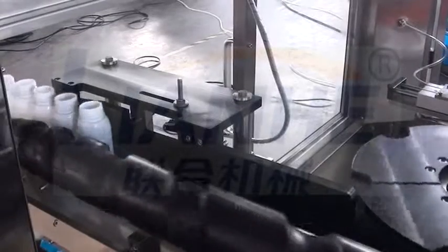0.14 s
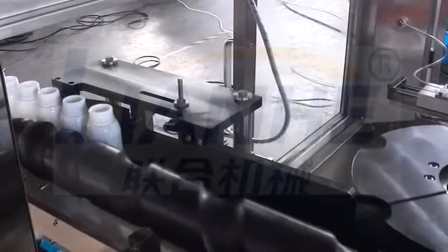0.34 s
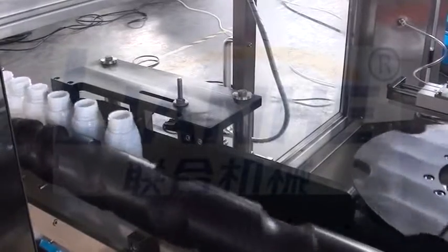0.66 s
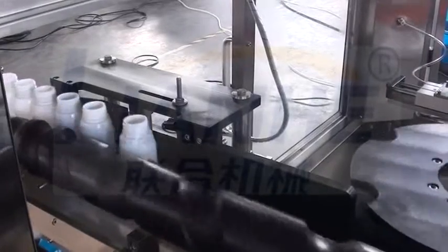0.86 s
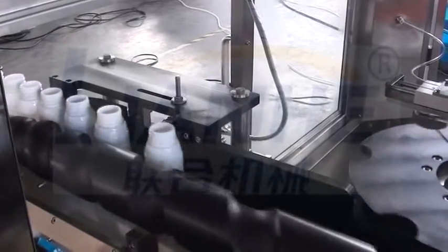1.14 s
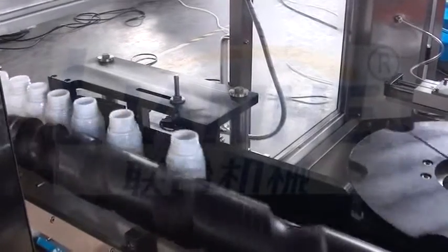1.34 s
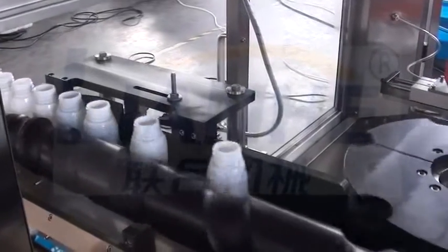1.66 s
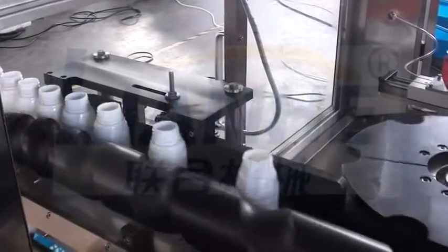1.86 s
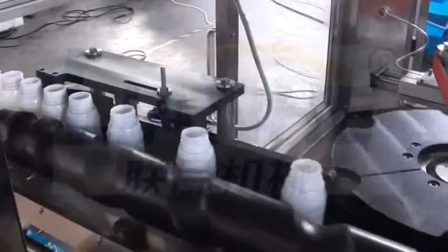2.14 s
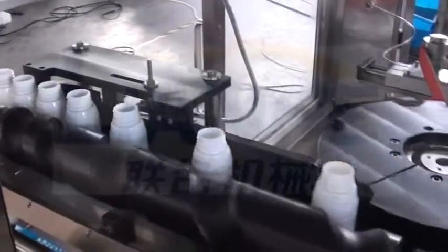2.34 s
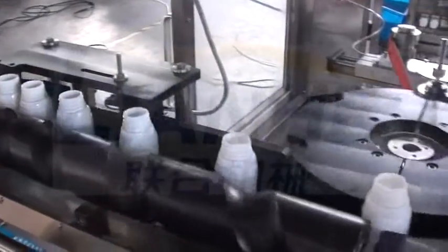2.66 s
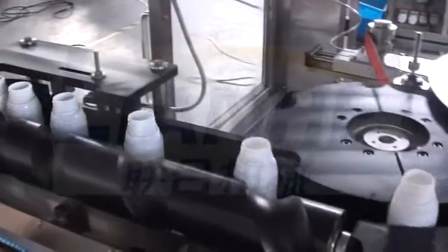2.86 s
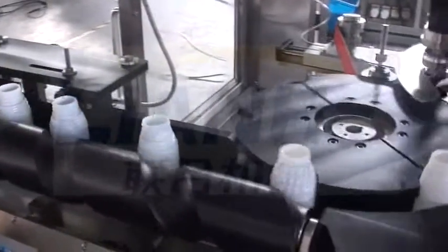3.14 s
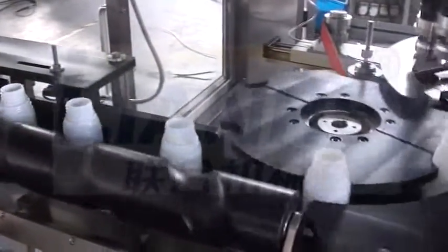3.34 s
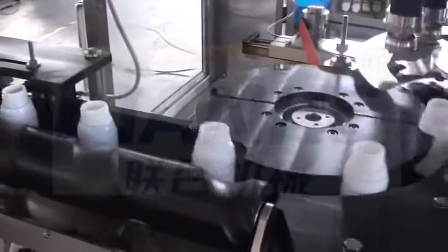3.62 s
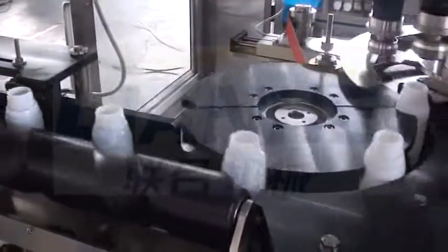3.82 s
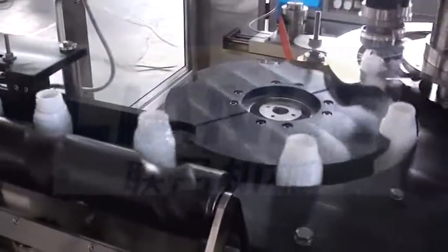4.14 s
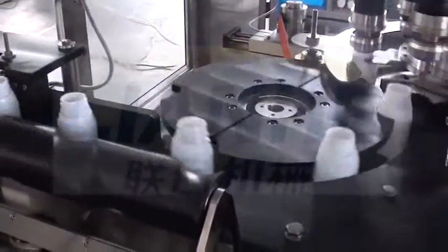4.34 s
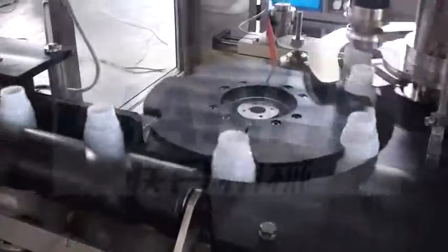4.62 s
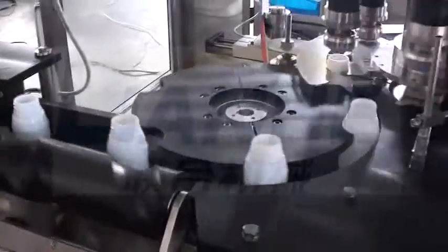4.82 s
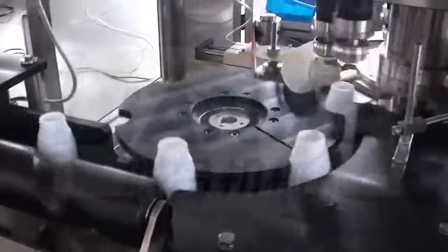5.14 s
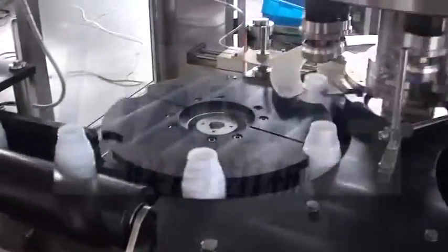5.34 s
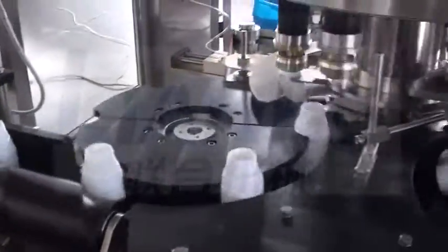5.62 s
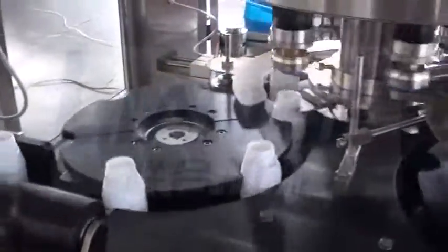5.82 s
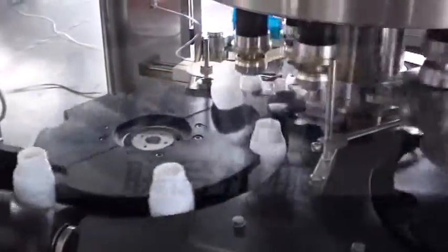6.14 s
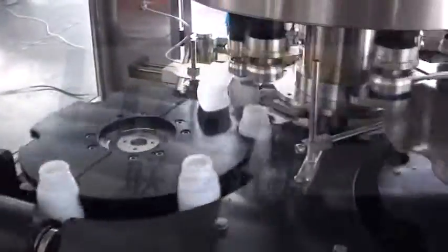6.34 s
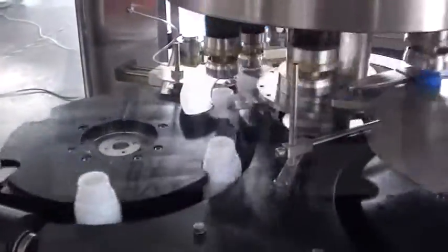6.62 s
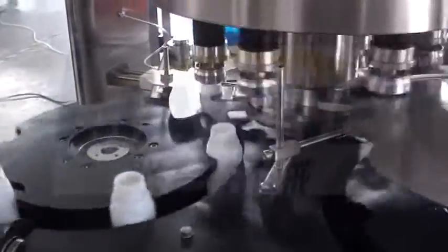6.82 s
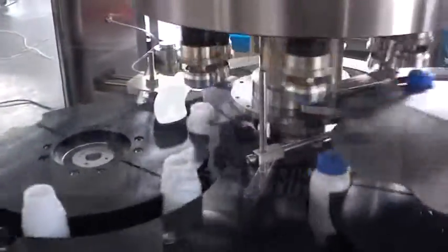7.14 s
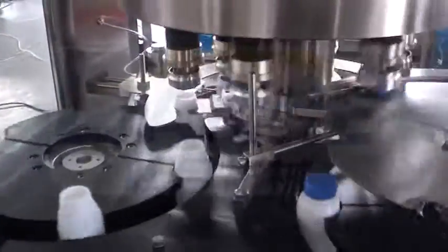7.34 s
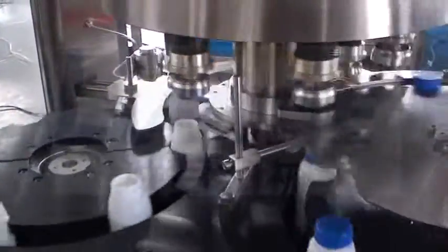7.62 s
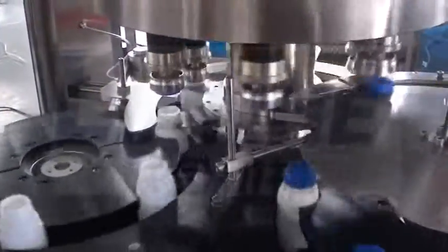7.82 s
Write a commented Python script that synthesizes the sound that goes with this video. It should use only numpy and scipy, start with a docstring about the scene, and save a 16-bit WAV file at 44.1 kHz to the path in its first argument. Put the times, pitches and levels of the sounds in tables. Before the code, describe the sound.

A rotary capping machine runs close to the microphone in a factory hall with a short, metallic echo. Its drives rumble and hum throughout, growing slightly louder over the eight seconds. From the very start, about every 0.6 seconds, an air cylinder clacks, thuds and vents a short, bright hiss, briefly pushing down the other noise. Loose parts clatter faintly underneath.

Plastic bottles click and snap between about 1 and 3 seconds, and again around 5 to 5.5. Sharp steel ticks and lightly ringing knocks are scattered throughout, with brief hollow scrapes around 4.1, 4.6 and 6.7 seconds. Softer air puffs fall between strokes near 3.2, 4 and 6.5 seconds. At about 6.9 a harder knock rings on a steel guide. A wavering air leak then grows louder, and from 7.3 to 7.8 seconds the chucks give several very short, high squeals on the caps.

```python
"""A factory hall, where a rotary capping machine runs close to a camera moving towards its heads.
Over the rumble of the drives, steel parts scrape, tick and ring, plastic bottles click in the feed
screw, and late on the chucks squeal on the caps by stick-slip friction. About every 0.63 s an air
cylinder clacks, thuds home and vents a turbulent jet. Steel plates and the hall reflect these
sounds, and the camera's limiter ducks the din under each blast."""
import sys
import numpy as np
from scipy import signal
from scipy.fft import rfft, irfft, next_fast_len
from scipy.io import wavfile
from scipy.ndimage import uniform_filter1d, minimum_filter1d, map_coordinates

SR = 44100
rng = np.random.default_rng(int(sys.argv[2]) if len(sys.argv) > 2 else 0)


def master_out(mix):
    """Clip the mix to full scale and print it as 16-bit PCM to the path in sys.argv[1]."""
    frames = np.transpose(np.atleast_2d(mix))
    ceiling = np.clip(frames, -1, 1)
    pcm = np.round(ceiling * 32767).astype(np.int16)
    wavfile.write(sys.argv[1], SR, pcm)


N = 351477


def amp(db):
    """Decibels to amplitude ratio."""
    return 10 ** (np.asarray(db) / 20)


def unit(x):
    """Normalisation to rms 1."""
    return x / np.sqrt(np.mean(x ** 2) + 1e-20)


def along(points, hz):
    """Interpolation of (frequency [Hz], value) points on a log axis."""
    f, v = np.transpose(points)
    return np.interp(np.log(hz + 1), np.log(f + 1), v)


def wobble(rate, size=N):
    """Smooth random modulation with `rate` knots a second."""
    knots = rng.standard_normal(int(size * rate / SR) + 4)
    return map_coordinates(knots, [np.arange(size) * rate / SR])


def filtered(x, response):
    """Linear filtering: the spectrum of x times a frequency response."""
    m = next_fast_len(len(x) + SR // 4)
    return irfft(rfft(x, m) * response(np.fft.rfftfreq(m, 1 / SR)), m)[:len(x)]


def resonate(x, modes):
    """Modal superposition: x drives (frequency [Hz], bandwidth [Hz], level [dB]) resonators."""
    return filtered(x, lambda f: sum((-1) ** k * amp(db) * 1j * f * bw / (hz * hz - f * f + 1j * f * bw)
                                     for k, (hz, bw, db) in enumerate(modes)))


def noise(spectrum, size=N):
    """Coloured noise of rms 1, cut off at the last point of its spectrum."""
    white = rng.standard_normal(size)
    return unit(filtered(white, lambda hz: amp(along(spectrum, hz)) * (hz < spectrum[-1][0])))


def ringing(hz, width_hz, size):
    """Noise of rms 1 in one steep-sided resonance."""
    mode = [(hz, width_hz, 0)]
    return unit(resonate(resonate(rng.standard_normal(size), mode), mode))


def burst(t, rise, hold, t60):
    """Quadratic attack, with exponential decay from time `hold`; all in seconds."""
    return np.clip(t / rise, 0, 1) ** 2 * amp(-60 * np.maximum(t - hold, 0) / t60)


def add(track, s, sound):
    """Superposition of a sound on the track at time s."""
    start = round(s * SR)
    part = sound[max(-start, 0):max(N - start, 0)]
    track[max(start, 0):][:len(part)] += part


# decay of the hall: (frequency [Hz], reverberation time [s])
HALL_DECAY = [(150, 0.41), (1500, 0.4), (7000, 0.54)]

def hall(x):
    """Reverberation: in the steel cabinet and the hall each frequency decays at its own rate."""
    hz, t, spectra = signal.stft(rng.standard_normal(SR // 2), SR, nperseg=256)
    decay = amp(-60 * t / along(HALL_DECAY, hz)[:, None])
    tail = signal.istft(spectra * decay, SR, nperseg=256)[1]
    return signal.fftconvolve(x, tail / np.linalg.norm(tail))[:N]


# reflections off nearby steel plates: (delay [s], level [dB])
PLATE_ECHOES = [(.0019, -19.5), (.0047, -13), (.0083, -17)]

def plates(x):
    """Comb filtering: short echoes interfere with the direct sound and colour it metallic."""
    return filtered(x, lambda hz: 1 + sum(amp(db) * np.exp(-2j * np.pi * hz * delay)
                                          for delay, db in PLATE_ECHOES))


# noise of drives and conveyors: (frequency [Hz], spectrum level [dB])
DRIVE_SPECTRUM = [(25, -43.5), (72, -16), (125, -10.5), (151, -5), (206, -11.5), (490, -12.5), (950, -9.5),
                  (1200, -11.5), (1850, -13.5), (2250, -15.5), (3900, -16.5), (4900, -20.5), (6200, -21.5),
                  (7700, -20)]
# frame resonances: (frequency [Hz], bandwidth [Hz], level [dB])
FRAME_MODES = [(159.5, 16, -6), (275, 37, -3.5), (360, 49, -3.5), (627.4, 50, -1.5), (991, 100, -9.5)]
# motor and gear tones: (frequency [Hz], level [dB])
MOTOR_TONES = [(150.7, -40.5), (639, -44.5), (1566, -55), (2305, -59)]

def drives():
    """Forced vibration: gears and conveyors shake the frame, under slightly unsteady motor tones."""
    t = np.arange(N) / SR
    din = noise(DRIVE_SPECTRUM) * amp(-1 + 0.41 * wobble(7) + 0.72 * wobble(70))
    frame = unit(resonate(rng.standard_normal(N), FRAME_MODES)) * amp(-7.5 + 1.1 * wobble(9))
    hum = sum(amp(db + 0.7 * wobble(6.9)) * np.sin(2 * np.pi * hz * t + 0.68 * wobble(8))
              for hz, db in MOTOR_TONES)
    approach = amp(-26.5 + 0.2354 * (t - t.mean()))  # louder as the camera moves in
    return approach * (din + frame) + hum


# escaping air: (frequency [Hz], spectrum level [dB])
JET_SPECTRUM = [(300, -39.5), (2000, -20), (3000, -10), (3700, -6.5), (4400, -2.5), (5000, -5.5),
                (5900, -1.5), (6600, 1.5), (7500, 1.5), (11000, -0.5), (16000, -12.5)]
# leak at the heads, louder as they come near: (time [s], level [dB])
LEAK_LEVELS = [(0, -38), (1.4, -40.5), (2.3, -49), (3.9, -42), (4.5, -35.5), (5.3, -44), (5.9, -30.5),
               (6.6, -42), (7.05, -26), (7.97, -24)]

def leak():
    """Turbulence: air leaking at the heads gives a continuous, wavering hiss."""
    level_db = np.interp(np.arange(N) / SR, *np.transpose(LEAK_LEVELS))
    return amp(level_db + wobble(18)) * noise(JET_SPECTRUM)


# clack of loose parts and of the cylinder's slide: (frequency [Hz], spectrum level [dB])
CLACK_SPECTRUM = [(60, -24), (290, 1), (450, -4.5), (650, -2.5), (1250, -7), (1900, -1.5), (2250, -7),
                  (3000, -2.5), (3500, -5.5), (4300, -4.5), (5000, -10.5), (6300, -6.5), (7700, -9)]

def loose_parts():
    """Random impacts: loose parts make a faint clatter."""
    envelope, t = np.zeros(N), np.arange(SR // 2) / SR
    for when, strength in rng.random(size=(70, 2)):
        add(envelope, when * N / SR, amp(-40 + 7 * strength) * burst(t, 0.00047, 0.002, 0.05))
    return envelope * noise(CLACK_SPECTRUM)


# parts rubbing on the rails: (time [s], duration [s], level [dB], frequency [Hz])
RAIL_SCRAPES = [(2.717, 0.27, -44, 2900), (4.099, 0.083, -31, 3170), (4.122, 0.17, -34.5, 1980),
                (4.627, 0.045, -28.5, 1930), (6.688, .08, -36, 2830), (6.814, 0.02, -32, 1800),
                (7.467, 0.02, -28.5, 3060)]

def rails():
    """Sliding friction: rubbing excites a broad resonance, giving a rough, hollow scrape."""
    out, t = np.zeros(N), np.arange(SR // 2) / SR
    for s, length, db, hz in RAIL_SCRAPES:
        scrape = amp(db + 4.3 * wobble(110, len(t))) * ringing(hz, 950, len(t))
        add(out, s, scrape * burst(t, 0.011, length, 0.2))
    return out


# modes of the steel guides: (frequency [Hz], level [dB], decay time T60 [s])
GUIDE_MODES = [(1553, -8.5, 0.34), (1870, -6.5, 0.39), (2323, -4.5, 0.45), (2520, 0.5, 0.088),
               (3000, -4.5, 0.14), (3200, -7, 0.25), (4240, -6.5, 0.18)]
# blows on the guides: (time [s], level [dB])
GUIDE_KNOCKS = [(1.272, -23.5), (2.526, -23.5), (3.02, -25), (4.118, -25.5), (4.143, -22), (6.362, -25.5),
                (6.93, -13), (7.567, -25)]

def guides():
    """Free vibration: each blow clicks and leaves the guide's damped modes ringing."""
    out, t = np.zeros(N), np.arange(SR // 2) / SR
    for s, db in GUIDE_KNOCKS:
        ring = np.zeros(len(t))
        for hz, mode_db, t60 in GUIDE_MODES:
            decay = amp(mode_db + rng.normal(0, 1.5) - 60 * t / t60)
            ring += decay * np.sin(2 * np.pi * hz * t + 0.35 * wobble(60, len(t)))
        contact = ringing(3000, 2200, len(t)) * burst(t, 0.001, 0.005, 0.059)
        add(out, s, amp(db) * (amp(-6) * ring + contact))
    return out


# hard contact of steel or bottle: (frequency [Hz], spectrum level [dB])
CONTACT_SPECTRUM = [(300, -17.5), (2000, -22.5), (3500, -6), (4600, -5), (5200, -4), (6400, -4),
                    (7700, -1.5), (12000, -5)]
# small steel parts striking: (time [s], level [dB])
STEEL_TICKS = [(0.105, -18.5), (1.622, -22.5), (4.557, -12.5), (5.284, -16.5), (5.819, -12), (6.364, -20),
               (7.082, -13.5), (7.572, -16)]

def ticks():
    """Impact noise: a brief, hard contact radiates a bright, broadband tick."""
    envelope, t = np.zeros(N), np.arange(SR // 2) / SR
    for s, db in STEEL_TICKS:
        add(envelope, s, amp(db) * burst(t, 0.00065, 0.0029, 0.057))
    return envelope * noise(CONTACT_SPECTRUM)


# bottles snapping against screw and guides: (time [s], level [dB], wall frequency [Hz])
BOTTLE_SNAPS = [(1.028, -25, 3870), (1.081, -17.5, 3970), (1.168, -27, 4400), (1.669, -21, 4160),
                (2.016, -30, 2600), (2.056, -25, 4200), (2.366, -24.5, 3640), (3.020, -24, 3400),
                (4.864, -21.5, 4070), (4.949, -20, 3830), (5.454, -19.5, 4060)]

def bottles():
    """Shell vibration: a struck bottle chatters at the pitch of its wall; a lower mode rings on."""
    out, t = np.zeros(N), np.arange(SR // 5) / SR
    for s, db, hz in BOTTLE_SNAPS:
        wall = ringing(hz, 500, len(t)) * burst(t, 0.00092, 0.0074, 0.062)
        neck = np.sin(2 * np.pi * 0.725 * hz * t) * burst(t, 0.0014, 0.003, 0.13)
        contact = noise(CONTACT_SPECTRUM, len(t)) * burst(t, 0.0009, 0.005, 0.067)
        add(out, s, amp(db) * (wall + amp(-10.5) * neck + amp(-3.5) * contact))
    return out


# chucks slipping on caps:
# (time [s], duration [s], first frequency [Hz], last frequency [Hz], level [dB], scatter [Hz])
CHUCK_SLIPS = [(7.277, 0.012, 6590, 6730, -18.5, 60), (7.355, 0.035, 5440, 5690, -19.5, 100),
               (7.609, .102, 5590, 5440, -23.5, 210), (7.709, .008, 6600, 6650, -16, 60),
               (7.722, 0.037, 6900, 7020, -13, 90)]

def chucks():
    """Stick-slip oscillation: a gliding squeal that scatters in pitch and flutters in strength."""
    out = np.zeros(N)
    for s, length, first_hz, last_hz, db, scatter_hz in CHUCK_SLIPS:
        t = np.arange(int((length + 0.056) * SR)) / SR
        hz = np.interp(t, [0, length], [first_hz, last_hz]) + scatter_hz * wobble(1100, len(t))
        flutter = amp(2.6 * wobble(300, len(t)))
        tone = unit(np.sin(2 * np.pi * np.cumsum(hz) / SR) * flutter)
        add(out, s, amp(db) * tone * burst(t, 0.0035, length, 0.028))
    return out


# softer puffs of air between strokes: (time [s], duration [s], level [dB])
AIR_PUFFS = [(3.196, 0.044, -21), (4.044, 0.17, -23), (6.413, 0.061, -26), (6.663, .1, -22.5)]

def air_jets(exhausts):
    """Jet noise: each exhaust or puff swells as its valve opens and dies as the pressure falls."""
    flow, t = np.zeros(N), np.arange(SR // 2) / SR
    for s, length, db in exhausts + AIR_PUFFS:
        add(flow, s, amp(db) * burst(t, rise=0.035, hold=length, t60=0.11))
    return flow * noise(JET_SPECTRUM) * amp(2 * wobble(90))


# resonances of the machine bed: (frequency [Hz], bandwidth [Hz], level [dB])
BED_MODES = [(116, 39, -2), (257, 55, -1.5), (330, 41, 2), (533, 70, -3.5), (670, 80, -7),
             (1140, 470, -11.5)]
# cylinder strokes, one per bottle:
# (time [s], clack level [dB], clack rise [s], thud level [dB], exhaust duration [s])
CYLINDER_STROKES = [(-.075, -5, 0.0055, -22, 0.064), (.538, -18.5, .0015, -21, 0.076),
                    (1.168, -20.5, 0.0018, -22, 0.066), (1.791, -19.5, 0.0086, -22.5, 0.11),
                    (2.424, -22, 0.0013, -25, 0.083), (3.044, -24, 0.0074, -23.5, 0.092),
                    (3.683, -19.5, .002, -33, 0.063), (4.310, -22.5, 0.0042, -24, 0.068),
                    (4.951, -19.5, 0.0029, -37, 0.071), (5.587, -21, 0.0006, -23.5, 0.098),
                    (6.209, -22, 0.006, -26.5, 0.073), (6.827, -23, .011, -30.5, 0.089),
                    (7.466, -22.5, 0.0065, -45, 0.061)]

def cylinder():
    """Impact excitation: the slide clacks and rattles, then hits its stop and shakes the bed."""
    travel_s, bed_cutoff_hz = 0.026, 85  # the bed radiates little below its cutoff
    out, t = np.zeros(N), np.arange(SR // 3) / SR
    for s, clack_db, rise, thud_db, _ in CYLINDER_STROKES:
        rattle = amp(1.6 * wobble(300, len(t))) * burst(t, rise, rise + 0.0065, 0.28)
        crack = 0.7 * burst(t, rise, 0.002, 0.018)  # only an abrupt blow cracks
        add(out, s, amp(clack_db) * noise(CLACK_SPECTRUM, len(t)) * (crack + rattle))
        force = rng.standard_normal(len(t))
        shake = filtered(force, lambda hz: hz ** 2 / np.hypot(hz ** 2, bed_cutoff_hz ** 2))
        thud = unit(resonate(shake, BED_MODES)) * burst(t, 0.0036, 0.019, 0.11)
        add(out, s + travel_s, amp(thud_db) * thud)
    return out


def scene():
    """Superposition: direct sound, reflections and din meet at one microphone, on both channels."""
    vent_delay_s, vent_db = 0.028, -11  # every stroke vents at the same pressure
    exhausts = [(s + vent_delay_s, length, vent_db) for s, *_, length in CYLINDER_STROKES]
    parts = cylinder() + bottles() + loose_parts() + guides() + ticks() + rails()
    heads = air_jets(exhausts) + leak() + chucks()
    reverberation = hall(amp(-12) * parts + amp(-14.5) * heads)
    mono = amp(-0.1) * plates(parts + heads) + reverberation + drives()
    return np.array([mono, mono])


def limiter(x, ceiling_db, hold_s):
    """Gain reduction: everything ducks while the rms level nears the ceiling, and briefly after."""
    level = np.sqrt(np.abs(uniform_filter1d(x ** 2, size=130)))
    gain = (1 + (level / amp(ceiling_db)) ** 6) ** (-1 / 6)  # soft knee
    span = max(int(hold_s * SR), 2)
    held_gain = minimum_filter1d(gain, span, origin=(span - 1) // 2)
    return x * uniform_filter1d(held_gain, size=90)


def record(dry):
    """Limiting and low-pass filtering: the camera holds down peaks, then cuts the top treble."""
    cutoff_hz = 7690
    mono = limiter(dry[0], ceiling_db=-16.0, hold_s=0.0052)
    mono = filtered(mono, lambda hz: 1 / np.sqrt(1 + np.minimum(hz / cutoff_hz, 2) ** 380))
    return np.array([mono, mono])


dry = scene()
out = record(dry)
master_out(out)
```